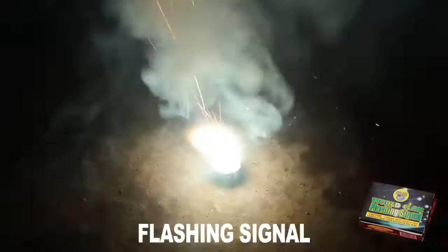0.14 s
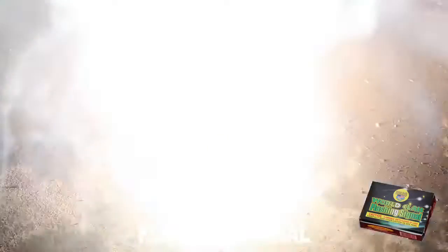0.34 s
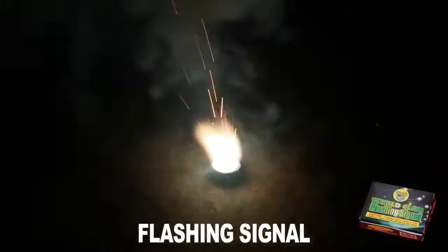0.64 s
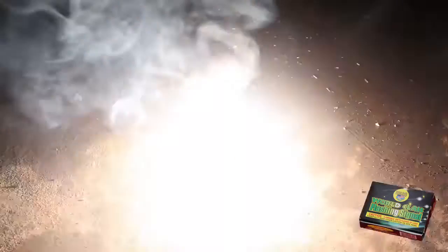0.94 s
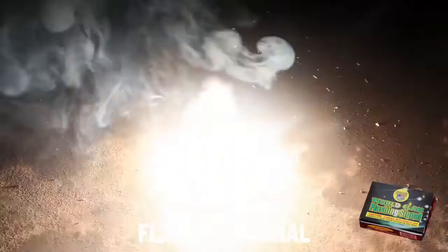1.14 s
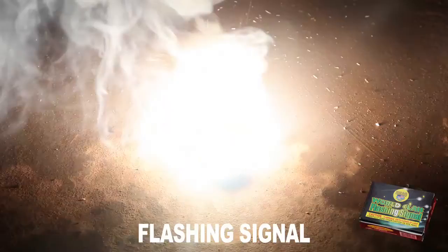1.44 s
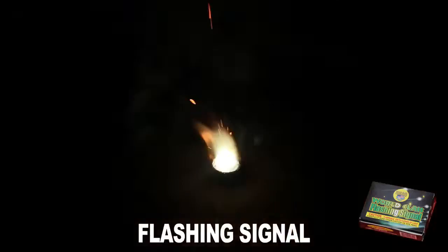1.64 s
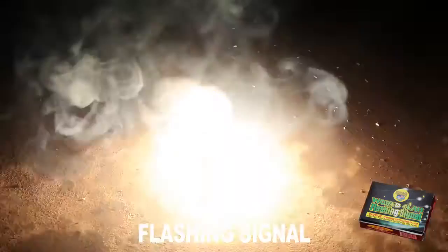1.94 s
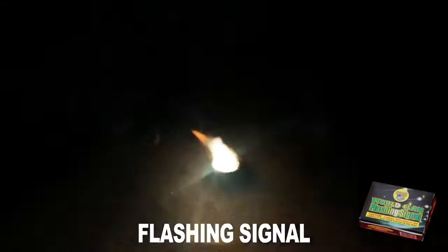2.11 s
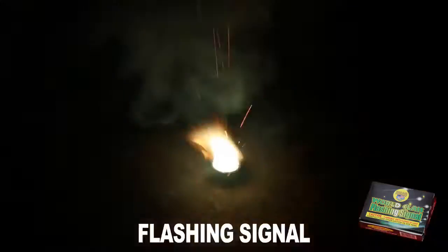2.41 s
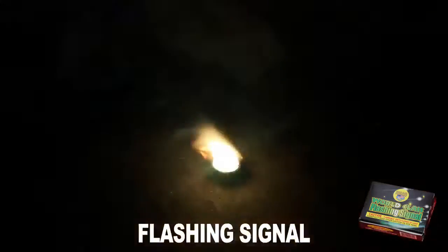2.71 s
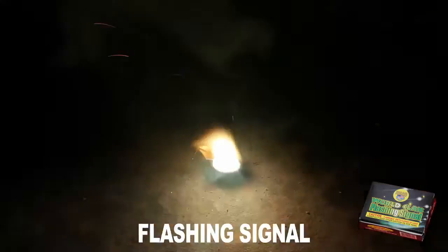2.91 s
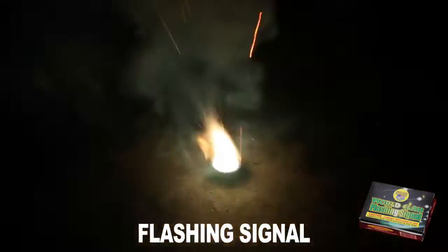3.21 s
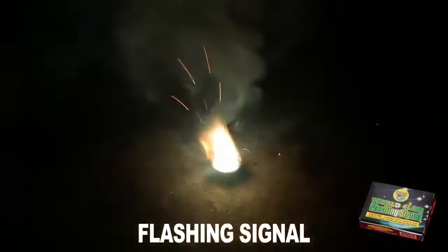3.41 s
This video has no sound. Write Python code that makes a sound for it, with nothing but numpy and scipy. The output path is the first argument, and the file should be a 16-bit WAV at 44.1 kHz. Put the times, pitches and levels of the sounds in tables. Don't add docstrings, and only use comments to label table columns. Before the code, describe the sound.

Steady harsh pops from a strobing firework on the ground, each swelling quickly and cutting off, then faint hiss and spark ticks before the next. Open yard with short bright reverberation, a small slightly distorted microphone.

```python
import sys
import numpy as np
from scipy import signal
from scipy.io import wavfile
from scipy.ndimage import uniform_filter1d

SR = 44100
rng = np.random.default_rng(int(sys.argv[2]) if len(sys.argv) > 2 else 0)


def boost(x):
    u = np.asarray(x, float) / 20
    return 10 ** u


def waveform_to_disk(signal):
    frames = np.transpose(np.atleast_2d(signal))
    scaled = np.clip(frames, -1, 1) * 32767
    samples = np.round(scaled).astype(np.int16)
    wavfile.write(sys.argv[1], SR, samples)


N = 156555
TIME_S = np.arange(N) / SR
FILTER_HZ = np.fft.rfftfreq(4096, 1 / SR)


def evened(x):
    return x / np.sqrt(np.mean(x ** 2) + 1e-20)


def read(points, hz):
    f, value = np.transpose(points)
    return np.interp(np.log(hz + 1), np.log(f + 1), value)


def coloured(x, gain_db):
    log = np.log(boost(np.maximum(gain_db, -100)))
    full = np.concatenate([log, log[-2:0:-1]])
    spectrum = np.exp(full - 1j * signal.hilbert(full).imag)
    taps = np.fft.ifft(spectrum).real[:len(log)]
    return signal.oaconvolve(x, taps)[:N]


def shaped(x, points):
    return coloured(x, read(points, FILTER_HZ))


def grains(per_s, spread_db):
    chance = rng.random(N)
    size = np.minimum(rng.exponential(1, N), 5)
    sign = rng.choice([-1., 1.], N)
    present = np.clip((per_s / SR - chance) * 200, 0, 1)
    return evened(sign * boost(spread_db * size) * present)


def flutter(ms):
    size = max(int(ms * SR / 1000), 1)
    smooth = uniform_filter1d(rng.standard_normal(N), size)
    return evened(uniform_filter1d(smooth, size))


def patchy(x):
    patch_db = 1.7
    z = signal.stft(x, nperseg=256)[2]
    clumps = uniform_filter1d(rng.standard_normal(z.shape[::-1]), size=6, axis=0)
    clumps = evened(uniform_filter1d(clumps, size=9, axis=1)).T
    return signal.istft(z * boost(patch_db * clumps - patch_db / 3), nperseg=256)[1][:N]


def add(mix, s, sound):
    part = mix[round(s * SR):][:len(sound)]
    part += sound[:len(part)]


def whistle(hz):
    return 6.5 * np.exp(-((hz - 6470) / 360) ** 2)


# (frequency [Hz], level [dB per Hz])
PUFF_SPECTRUM = [(24, -9), (40, -15), (399, 1.5), (1830, -0.5), (3510, -11), (6400, -20), (7070, -25.5),
                 (10600, -22.5), (15700, -29)]
EARLIER_S, EARLIER_LENGTH_S = 0.045, 0.054


def earlier():
    swell = np.exp(-((TIME_S - EARLIER_LENGTH_S) / EARLIER_LENGTH_S * 2) ** 2)
    return boost(-17.5) * evened(shaped(rng.standard_normal(N), PUFF_SPECTRUM)) * swell


# (frequency [Hz], time to die by 60 dB [s])
YARD_T60 = [(100, 1), (500, 0.23), (1500, 0.63), (3000, 0.67), (5000, 0.45), (8000, 0.27), (15000, 0.25)]
# (frequency [Hz], level [dB])
YARD_TONE_DB = [(100, -3.5), (1000, -2.5), (2500, -7.5), (4000, 8), (5400, 7), (6300, 10.5), (9000, 11.5),
                (15000, 0)]


def yard(sources):
    yard_db, gap_s = -12.5, 0.0079
    hz, t, z = signal.stft(rng.standard_normal(SR // 2), SR, nperseg=256)
    decay = boost(-60 * t / read(YARD_T60, hz)[:, None])
    tail = signal.istft(z * decay, SR, nperseg=256)[1]
    opening = np.clip(np.arange(len(tail)) / SR / gap_s, 0, 1) ** 2
    tail = tail / np.linalg.norm(tail) * opening
    gain_db = read(YARD_TONE_DB, FILTER_HZ) - whistle(FILTER_HZ)
    returns = [patchy(coloured(signal.fftconvolve(x, tail)[:N], gain_db)) for x in sources]
    return boost(yard_db) * np.array(returns)


# (time [s], pitch [Hz], level [dB])
HUM_DRIFT = [
    (0, 143.6, -51.5),
    (.35, 151, -72),
    (.6, 151.4, -82),
    (1.95, 172, -70),
    (2.15, 172.5, -53),
    (2.7, 172, -51),
    (3.25, 171.3, -49.5),
    (3.4, 173, -59),
    (3.55, 170, -61),
]


def hum():
    s, hz, db = np.transpose(HUM_DRIFT)
    turns = np.cumsum(np.interp(TIME_S, s, hz) + 0.67 * flutter(57)) / SR
    level = boost(np.interp(TIME_S, s, db) + 1.8 * flutter(70))
    return np.sqrt(2) * level * np.sin(2 * np.pi * turns)


# (frequency [Hz], level [dB per Hz])
FLAME_SPECTRUM = [(15, -18), (60, -2.5), (199, -3.5), (448, -6), (571, -1), (1700, -4.5), (3000, -15.5),
                  (4200, -18), (15700, -29)]


def flame(lead):
    flame_db, spit_db, ember_db, ember_t60_s = -42.5, -58.5, -19.5, 0.42
    r = boost(-120 / ember_t60_s / SR)
    embers = signal.lfilter([1 - r], [1, -r], lead ** 2)
    fed = embers * boost(2 * ember_db) + boost(2 * flame_db)
    hiss = evened(shaped(rng.standard_normal(N), FLAME_SPECTRUM)) * np.sqrt(fed)
    hiss = hiss * boost(1.3 * flutter(25) + .8 * flutter(5))
    spits = evened(shaped(grains(280, 1.7), PUFF_SPECTRUM))
    return hiss + boost(spit_db) * spits


# (peak time [s], build-up [s], dying time [s], peak level [dB], level on catching re peak [dB])
FLARE_EVENTS = [(0.16, 0.041, 0.038, -17, -17.5), (0.302, 0.029, 0.042, -24.5, -18.5),
                (.334, 0.018, 0.027, -28.5, -6), (0.409, 0.046, 0.042, -17, -10),
                (0.654, 0.031, 0.014, -14.5, -17.5), (0.864, 0.038, 0.016, -15, -25.5),
                (0.898, 0.015, 0.0086, -29, -10), (1.044, 0.046, 0.021, -16.5, -19.5),
                (1.25, 0.031, 0.026, -16, -7.5), (1.432, 0.062, 0.015, -15.5, -22),
                (1.472, 0.034, 0.017, -27, -9), (1.652, 0.035, 0.014, -16, -29),
                (1.856, 0.035, 0.022, -16.5, -18.5), (2.044, 0.038, 0.015, -16.5, -19.5),
                (2.237, 0.039, 0.022, -16.5, -25.5), (2.435, 0.047, 0.013, -16.5, -11.5),
                (2.562, 0.0086, .02, -33, -4), (2.613, 0.046, 0.04, -19, -10),
                (2.757, 0.015, 0.013, -33.5, -7), (2.844, 0.024, 0.016, -15, -23),
                (3.037, 0.035, 0.025, -18, -16), (3.222, 0.041, 0.013, -16.5, -17),
                (3.254, 0.012, 0.015, -37, -16), (3.355, 0.01, 0.034, -29, -2.5),
                (3.407, 0.047, 0.021, -16.5, -16.5)]
# (peak time [s], pitch [Hz], level over the puff [dB])
CUP_TINTS = [(.16, 960, -15.5), (.16, 724, -13), (.31, 895, -13), (.31, 550, -26), (0.406, 524, -4.5),
             (.405, 1820, -4.5), (.652, 892, 0.5), (.652, 650, -21), (0.861, 832, -2), (.862, 1830, -8),
             (.92, 810, -7), (1.04, 1560, -15), (1.04, 1930, -15), (1.237, 1440, -7.5), (1.245, 1950, -11),
             (1.425, 1700, -15), (1.425, 437, -7), (1.47, 1070, -6), (1.65, 973, 0.5), (1.65, 663, -10),
             (1.858, 563, -3.5), (1.855, 790, -8.5), (2.043, 1996, -1.5), (2.04, 1390, -7),
             (2.235, 1835, -20), (2.235, 390, -17), (2.425, 670, -13), (2.425, 445, -10), (2.61, 1850, -7),
             (2.61, 480, -12), (2.843, 1090, -13), (3.035, 1795, -4.5), (3.035, 400, -11),
             (3.215, 1670, -8), (3.215, 776, -6), (3.215, 380, -11), (3.40, 1740, -12), (3.40, 455, -22)]


def flare_powers():
    catch_s, dying_db, dying_bend, build_bend = 0.0055, -24.5, 2.1, 1.46
    full_db, treble_steep, air_steep = -16, 1.3, 1.2
    body, treble, air = np.zeros((3, N))
    for peak, build, dying, db, catch_db in FLARE_EVENTS:
        u = TIME_S - peak
        before = catch_db * np.clip(-u / build, 0, 1) ** build_bend
        after = dying_db * (np.maximum(u, 0) / dying) ** dying_bend
        lit = np.clip((u + build) / catch_s, 0, 1)
        body += (lit * boost(db + before + after)) ** 2
        treble += (lit ** 2 * boost(full_db + treble_steep * (db - full_db + before) + after)) ** 2
        air += (lit ** 2 * boost(air_steep * before + db + after)) ** 2
    return body, treble, air


def split(x, hz, side):
    return signal.sosfiltfilt(signal.butter(3, hz, side, fs=SR, output="sos"), x)


def cup_rings(burn):
    width_hz, length_s = 105, .018
    r = np.exp(-np.pi * width_hz / SR)
    out = np.zeros(N)
    for s, hz, db in CUP_TINTS:
        ring = signal.lfilter([1], [1, -2 * r * np.cos(2 * np.pi * hz / SR), r * r], burn)
        out += boost(db) * evened(ring) * np.exp(-((TIME_S - s) / length_s) ** 2)
    return out


def flares():
    split_hz, air_hz, ceiling = 3250, 7000, 1.9
    body, treble, air = flare_powers()
    gain_db = read(PUFF_SPECTRUM, FILTER_HZ) + whistle(FILTER_HZ)
    burn = evened(coloured(grains(9000, 1.24), gain_db))
    fizz = patchy(coloured(grains(16000, 1.5), gain_db))
    fizz = fizz * np.std(burn) / np.std(fizz)
    mid, top = split(fizz, split_hz, "high"), split(fizz, air_hz, "high")
    high = (mid - top) * np.sqrt(treble) * boost(1 + 0.96 * flutter(5.7))
    high = high + top * np.sqrt(air) * boost(-3 + 0.91 * flutter(3.4))
    low = split(burn, split_hz, "low") + cup_rings(burn)
    knocks, spared = cracks()
    low = ceiling * np.tanh(low / ceiling) * np.sqrt(body) * spared
    low = low * boost(-0.01 + 1.6 * flutter(6.6))
    return (low + high) * boost(1.6 * flutter(0.75)) + knocks


# (time [s], peak level [dB], pitch [Hz])
BEAD_CRACKS = [(0.1519, -9.0, 1370.0), (0.1681, -9.0, 1500.0), (0.3339, -16.0, 1430.0),
               (0.4026, -7.0, 1390.0), (0.4101, -6.0, 1430.0), (0.4289, -13.0, 1540.0),
               (0.6555, -5.0, 1100.0), (0.6584, -6.0, 1220.0), (0.8308, -21.0, 1330.0),
               (0.8572, -7.0, 1400.0), (0.8686, -8.0, 1100.0), (0.8944, -16.0, 1350.0),
               (1.0357, -9.0, 1710.0), (1.0406, -8.0, 1180.0), (1.0477, -8.0, 1700.0),
               (1.0522, -11.0, 2010.0), (1.249, -4.0, 1350.0), (1.2576, -8.0, 1910.0),
               (1.4132, -12.0, 1270.0), (1.4194, -9.0, 1650.0), (1.4273, -8.0, 1580.0),
               (1.43, -7.0, 1130.0), (1.4351, -8.0, 1030.0), (1.4667, -16.0, 1370.0),
               (1.6464, -6.0, 1350.0), (1.6498, -7.0, 1000.0), (1.6564, -7.0, 1320.0),
               (1.6631, -15.0, 1700.0), (1.8532, -8.0, 1350.0), (1.8575, -7.0, 1050.0),
               (1.8606, -8.0, 1000.0), (2.0447, -6.0, 1530.0), (2.0515, -9.0, 1560.0),
               (2.2319, -7.0, 1500.0), (2.242, -8.0, 2250.0), (2.249, -12.0, 1630.0),
               (2.4066, -10.0, 1200.0), (2.4295, -9.0, 1660.0), (2.4398, -8.0, 1520.0),
               (2.6024, -10.0, 1700.0), (2.6166, -7.0, 1140.0), (2.6355, -14.0, 1640.0),
               (2.8356, -10.0, 1190.0), (2.8404, -6.0, 1440.0), (2.8458, -7.0, 1350.0),
               (3.035, -6.0, 1100.0), (3.0387, -9.0, 1620.0), (3.0473, -12.0, 1400.0),
               (3.0555, -17.0, 1530.0), (3.2034, -11.0, 1080.0), (3.214, -9.0, 1380.0),
               (3.2202, -9.0, 1050.0), (3.2288, -10.0, 1030.0), (3.3714, -16.0, 1250.0),
               (3.4004, -7.0, 1420.0), (3.4084, -7.0, 1300.0), (3.4109, -6.0, 1430.0)]


def cracks():
    crack_db, cycles, hush_depth, hush_s = -.5, .33, .85, .001
    out, hush, t = np.zeros(N), np.zeros(N), np.arange(-.003, .003, 1 / SR)
    count = len(BEAD_CRACKS)
    turns = rng.choice([0, .5], count) + rng.uniform(-.1, .1, count)
    for (s, db, hz), turn in zip(BEAD_CRACKS, turns):
        knock = np.cos(2 * np.pi * (hz * t + turn)) * np.exp(-(hz * t / cycles) ** 2)
        add(out, s + t[0], boost(db + crack_db) * knock)
        add(hush, s + t[0], hush_depth * np.exp(-(t / hush_s) ** 2))
    return out, 1 - np.clip(hush, 0, 1)


# (start time [s], peak level [dB], pitch [Hz])
GAS_PUSHES = [(0.156, -28, 118), (0.393, -21, 113), (0.65, -21.5, 210), (.856, -20.5, 100),
              (1.036, -31, 110), (1.249, -19.5, 113), (1.424, -14, 292), (1.645, -14, 157.5),
              (1.85, -20, 142), (2.035, -27, 132), (2.235, -24, 190), (2.43, -23, 245), (2.612, -24.5, 99),
              (2.834, -12, 382), (3.029, -21.5, 130.4), (3.217, -16.5, 239), (3.402, -24.5, 164),
              (1.191, -35, 85), (1.495, -32, 95), (1.675, -33, 170), (2.065, -40, 80)]


def pushes():
    push_s, push_db, under_share, sag_per_s = 0.0062, -3.5, 0.48, 4.3
    out, t = np.zeros(N), np.arange(0, .08, 1 / SR)
    slowing = np.log1p(sag_per_s * t) / sag_per_s
    swell = (t / push_s * np.exp(1 - t / push_s)) ** 2
    draws = rng.uniform(-0.92, 1, (len(GAS_PUSHES), 3))
    for (s, db, hz), (a, b, c) in zip(GAS_PUSHES, draws):
        under_hz = hz * 0.52 * (1 + 0.2 * b)
        swing = np.sin(2 * np.pi * hz * slowing + a)
        swing = swing + under_share * np.sin(2 * np.pi * (under_hz * slowing + c / 2))
        add(out, s, boost(db + push_db) * swing * swell)
    return out


# (time [s], peak level [dB])
SPARK_SNAPS = [(.2946, -19), (.3058, -19), (.3736, -19), (.5123, -23), (.6037, -26), (.7671, -27),
               (.7977, -26), (.8394, -24), (.964, -25), (.9795, -28), (1.3818, -23), (1.6181, -27),
               (1.7901, -25), (1.7908, -20), (1.8267, -14), (1.9954, -19), (2.0009, -26), (2.0154, -21),
               (2.2134, -19), (2.5595, -24), (2.7044, -27), (2.9705, -30), (3.3511, -23)]


def snaps():
    snap_s, lean, snap_db = .00014, .15, 0.1
    out, t = np.zeros(N), np.arange(-.002, .002, 1 / SR)
    stretches = 1 + 0.18 * rng.uniform(0.14, 1, len(SPARK_SNAPS))
    for (s, db), stretch in zip(SPARK_SNAPS, stretches):
        u = t / (snap_s * stretch)
        add(out, s + t[0], -boost(db + snap_db) * (u + lean) * np.exp(.5 - u ** 2 / 2))
    return out


def scene():
    lead = flares() + pushes() + snaps()
    lead_tail, earlier_tail = yard([lead, earlier()])
    skip = round((EARLIER_S + EARLIER_LENGTH_S) * SR)
    earlier_tail = np.pad(earlier_tail[skip:], (0, skip))
    return (lead + lead_tail + earlier_tail + flame(lead) + hum())[None]


def top_cut(x):
    return signal.sosfilt(signal.butter(12, 15890, fs=SR, output="sos"), x)


# (frequency [Hz], width [Hz], level [dB])
MIC_COLOUR = [(773, 30, -4), (1196, 33, -4), (1790, 87, 1), (2392, 56, -8.5), (2800, 1030, 3.5),
              (3590, 290, -3.5), (4310, 300, -4.5), (5140, 910, 3.5), (5950, 78, -8), (7500, 600, 2.5)]


def highpassed(x, hz):
    return signal.sosfilt(signal.butter(2, hz, "high", fs=SR, output="sos"), x)


def record(dry):
    bounce_s, bounce_db, limit = .00265, -14, .6
    bounce = np.pad(highpassed(dry[0], 900), (round(bounce_s * SR), 0))[:N]
    heard = dry[0] + boost(bounce_db) * bounce
    gain_db = sum(db * np.exp(-((FILTER_HZ - f) / w) ** 2) for f, w, db in MIC_COLOUR)
    heard = limit * np.tanh(coloured(heard, gain_db) / limit)
    heard = highpassed(heard, 40)
    edge = signal.firwin(1023, 15780, window=("kaiser", 10), fs=SR)
    heard = signal.oaconvolve(heard, edge, "same")
    return top_cut(heard[None])


dry = scene()
out = record(dry)
waveform_to_disk(out)
```